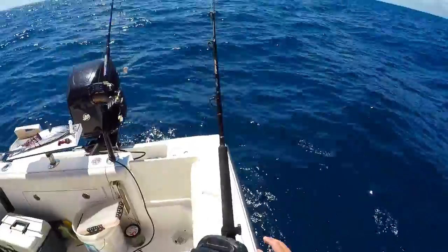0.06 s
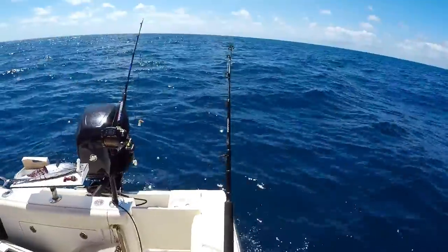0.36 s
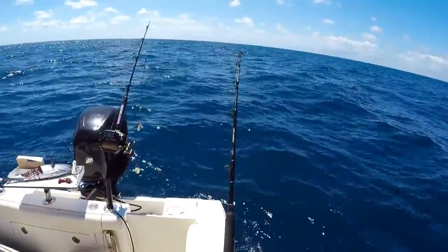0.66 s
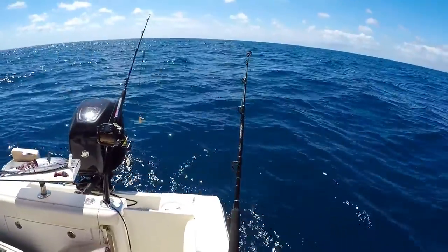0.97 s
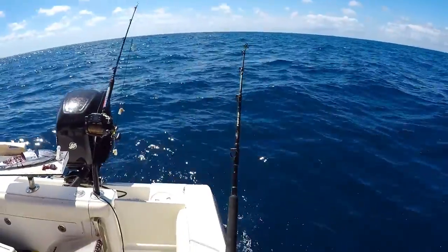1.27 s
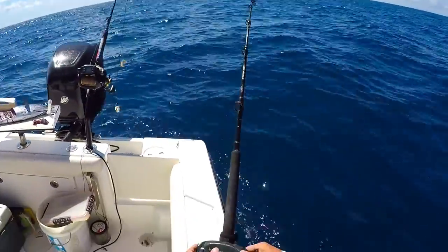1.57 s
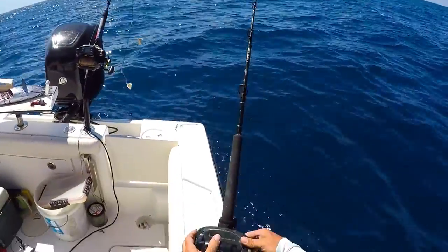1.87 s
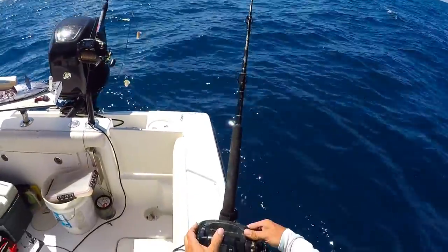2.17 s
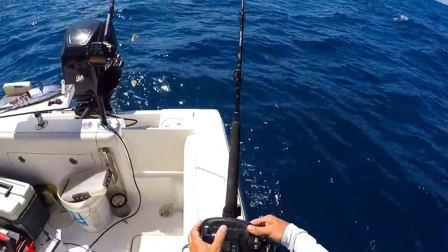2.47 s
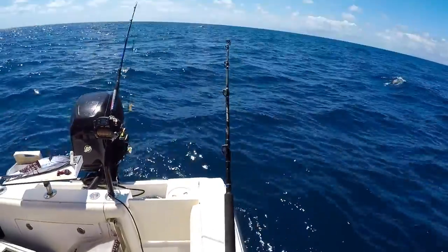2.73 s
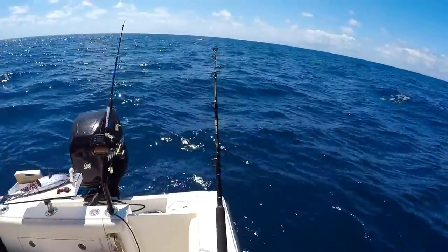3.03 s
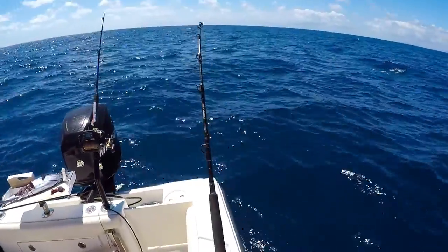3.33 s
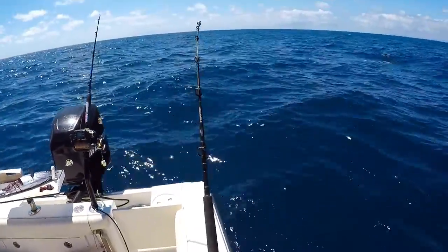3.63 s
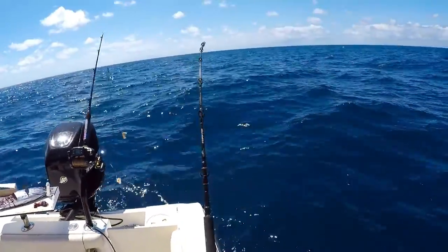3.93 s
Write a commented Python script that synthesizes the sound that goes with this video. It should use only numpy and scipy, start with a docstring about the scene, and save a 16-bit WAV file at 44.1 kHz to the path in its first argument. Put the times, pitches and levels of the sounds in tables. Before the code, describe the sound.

An electric fishing reel whirrs and rasps on a small boat at sea, slowing under load, then speeding up. Wind buffets the microphone, water slops along the hull and an outboard idles; a wave slaps near the end.

```python
"""An electric fishing reel winds in line on a small boat at sea. From the start its gear tones slide
through the housing's resonances over a rasp that turns with the shaft, while wind rumbles on the
microphone, water washes along the hull and the outboard idles. Hollow slops, light knocks and hard
buffets soon break in. As the swell loads the line the motor slows, and the reel hisses and squeaks
once; then it speeds up again, and near the end a wave slaps the hull on the right."""
import sys
import numpy as np
from scipy import signal
from scipy.fft import rfft, irfft
from scipy.io import wavfile
from scipy.ndimage import uniform_filter1d

SR = 44100
rng = np.random.default_rng(int(sys.argv[2]) if len(sys.argv) > 2 else 0)


def bounce(signal):
    """Save signal as a 16-bit WAV file at the path given by the first command-line argument."""
    frames = np.transpose(np.atleast_2d(signal))
    limited = np.clip(frames, -1, 1)
    pcm = np.round(limited * 32767).astype(np.int16)
    wavfile.write(sys.argv[1], SR, pcm)


N = 176400
T = np.arange(N) / SR
HZ = np.fft.rfftfreq(N, 1 / SR)


def amp(db):
    """Amplitude ratio for a level in decibels."""
    return 10 ** (np.asarray(db) / 20)


def unit(x):
    """Normalisation to an rms of 1."""
    return x / np.sqrt(np.mean(x ** 2) + 1e-20)


def curve(rows):
    """Linear interpolation of a time table's columns at every sample."""
    times, *columns = np.transpose(rows)
    return np.array([np.interp(T, times, column) for column in columns])


def spectrum(rows):
    """Interpolation of a frequency table's columns on a logarithmic axis."""
    hz, *columns = np.transpose(rows)
    return np.array([np.interp(np.log(HZ + 1), np.log(hz), column) for column in columns])


def wander(rate_hz):
    """Random fluctuation: low-pass noise of rms 1."""
    return unit(irfft(rfft(rng.standard_normal(N)) / (1 + (HZ / rate_hz) ** 4), N))


def pair(a, b, coherence):
    """Partial coherence: two channels mixed from two independent signals."""
    return np.array([a, coherence * a + np.sqrt(1 - coherence ** 2) * b])


def panned(side_db):
    """Constant-power gains for a level difference, left minus right."""
    gains = amp(np.array([[side_db], [-side_db]]) / 2)
    return gains / np.sqrt(np.mean(gains ** 2))


def add(mix, start, sound):
    """Superposition of a sound on the mix, from a start in seconds."""
    part = mix[:, max(round(start * SR), 0):][:, :sound.shape[-1]]
    part += sound[..., :part.shape[1]]


def gear_tones(turns, waver_db=1.1, throb_depth=0.6, throb_above_order=80):
    """Forced vibration: tooth meshes and their sidebands, locked to the shaft, drive the housing."""
    # Each row: order in cycles per shaft turn, level in dB before the housing colours it.
    partials = [(18.8, -34), (22, -41), (31, -34.5), (33, -50), (55, -53), (57, -33), (60, -48), (62, -41),
                (64, -49), (66, -50), (72, -50), (77, -49), (88, -49), (93, -39.5), (110, -52), (117, -46),
                (124, -52), (174, -47.5), (186, -45), (217, -48), (231, -45), (234, -46), (262, -48),
                (288, -47), (291, -44)]
    # The housing's resonances. Each row: frequency in Hz, left gain in dB, right gain in dB.
    housing = [(420, -9, -10), (490, -7, -4), (535, -2, -1), (575, -13, -13), (680, -16, -6), (800, -8, -2),
               (848, 0, 5), (885, 1, 3), (910, -10, -5), (1000, -9, -3), (1235, -2, -5), (1290, 3, 1),
               (1380, 4, 2), (1480, -4, -7), (1535, 1, -3), (1600, -11, -11), (1780, -13, -11),
               (2000, -7, -3), (2400, -4, -6), (2600, -7, -6), (2790, 1, 5), (2930, 2, 5), (3100, -3, -2),
               (3700, -9, -12), (3960, 0, 5), (4200, -6, -2), (7000, -5, -3), (9500, -16, -16)]
    throb = 1 + throb_depth * np.cos(2 * np.pi * 2 * turns)
    tones = np.zeros(N)
    for order, db in partials:
        tone = amp(db + waver_db * wander(16.5)) * np.sin(2 * np.pi * (order * turns + rng.random()))
        tones += tone * throb if order > throb_above_order else tone
    return np.sqrt(2) * irfft(rfft(tones) * amp(spectrum(housing) - 0.17), N)


def rasp_spectrum(speed, turns, repeat_share=0.3, flicker_db=1.75):
    """Friction noise of rough teeth: it partly repeats each turn, throbs twice a turn and flickers."""
    # Bands that move with speed. Each row: centre and width in cycles per turn, lift in dB.
    bands = [(63.9, 5.4, 2), (120.3, 5.8, 4), (194, 4.3, 2.5), (277, 15, 3)]
    pattern = unit(irfft(np.exp(2j * np.pi * rng.random(512)), 16384))
    repeating = np.interp(turns % 1, np.linspace(0, 1, len(pattern)), pattern)
    friction = np.sqrt(repeat_share / 2) * repeating + np.sqrt(1 - repeat_share) * rng.standard_normal(N)
    hz, t, frames = signal.stft(friction, SR, nperseg=256)
    order = hz[:, None] / np.interp(t, T, speed)
    lift_db = sum(db * np.exp(-((order - centre) / width) ** 2) for centre, width, db in bands)
    patches = uniform_filter1d(rng.standard_normal(frames.shape), size=5, axis=0)
    patches = unit(uniform_filter1d(patches, size=10, axis=1))
    throb_depth = 0.19 * np.exp(-hz[:, None] / 5060)  # shallower in the treble
    throb = 1 + throb_depth * np.cos(2 * np.pi * 2 * np.interp(t, T, turns))
    _, rasp = signal.istft(frames * throb * amp(lift_db + flicker_db * patches), SR, nperseg=256)
    return rfft(rasp[:N])


def reel(jitter=0.0008, load_db_per_slowing=0.25, tone_follows_rasp=0.25):
    """Rotating machinery: one shaft paces tones and rasp; the teeth sing louder as load slows it."""
    # Each row: time in seconds, shaft speed in turns per second.
    shaft_speed = [(0.0, 21.81), (0.25, 24.78), (0.5, 27.57), (0.75, 28.67), (1.0, 28.44), (1.25, 27.42),
                   (1.5, 25.95), (1.75, 24.75), (2.0, 23.7), (2.25, 22.8), (2.5, 22.55), (2.75, 23.66),
                   (3.0, 25.4), (3.25, 27.67), (3.5, 29.98), (3.75, 31.37), (4.0, 31.76)]
    # Each row: time in seconds, relative level of the rasp in dB.
    rasp_levels = [(0, -42.5), (0.19, -39.5), (0.58, -31.5), (0.73, -33.5), (1.43, -30), (2.47, -30.5),
                   (2.64, -32.5), (3.26, -29.5), (4.0, -31.5)]
    # Rasp of gears and line. Each row: frequency in Hz, left and right relative density in dB.
    rasp_colour = [(304, 4.5, -31), (556, -2, 2), (670, -26, 2.5), (856, -7, 0), (1000, -7, -9),
                   (1248, -16, -4.5), (1503, 6, 1.5), (1806, -15.5, -7.5), (1990, -4.5, 1.5),
                   (2400, -5, -6), (3010, -1, 1.5), (3670, -13, -6), (3830, -1.5, -5), (4620, -11, -6),
                   (5290, -0.5, -6.5), (5950, -5.5, -3.5), (5940, -12, 3), (6850, -2.5, -5.5),
                   (7580, -11, -1), (8120, -11.5, -15), (9380, -3.5, -7.5), (11220, -20.5, -20.5),
                   (14100, -25, -26)]
    # Each row: frequency in Hz, coherence of the channels, phase lead of the left in radians.
    stereo_field = [(500, .85, -.3), (900, .85, .4), (1350, .85, -.4), (1600, .65, -1.4), (2000, .6, -.8),
                    (2800, .75, -1.1), (3800, .5, -.1), (5170, .5, -1.8), (6120, .75, -5.2),
                    (6900, .75, -7.6), (8200, .6, -12.5), (9300, .78, -14.6), (10200, .6, -15.9)]
    speed = uniform_filter1d(curve(shaft_speed)[0], size=SR // 5, mode="nearest")
    turns = np.cumsum(speed * (1 + jitter * wander(25.8))) / SR
    slowing = -np.gradient(speed, T)  # turns per second lost each second
    rasp_db = curve(rasp_levels)[0] + 2
    tone_db = tone_follows_rasp * (rasp_db - rasp_db.mean()) + load_db_per_slowing * slowing
    coherence, lead = spectrum(stereo_field)
    friction = pair(rasp_spectrum(speed, turns), rasp_spectrum(speed, turns), coherence)
    rasp = unit(irfft(friction * amp(spectrum(rasp_colour)), N))
    left, right = rfft(amp(rasp_db) * rasp + amp(tone_db) * gear_tones(turns))
    return irfft(np.array([left, right * np.exp(-1j * lead)]), N)


def reel_hiss(coherence=0.46):
    """Broadband treble noise from the reel, strongest while the motor labours."""
    # Each row: frequency in Hz, relative spectral density in dB.
    colour = [(3000, -25), (5500, -5), (6700, 1), (8200, -9), (10000, -8), (12200, -7), (14000, -11)]
    # Each row: time in seconds, rms level in dB.
    levels = [(0, -56), (1.2, -54), (1.7, -45), (2.35, -44), (2.65, -54), (4, -56)]
    noise = pair(*rng.standard_normal((2, N)), coherence)
    hiss = irfft(rfft(noise) * amp(spectrum(colour)), N)
    return amp(curve(levels)) * unit(hiss)


def wind(crossover_hz=125, flutter_db=2.5, coherence=0.073):
    """Turbulent pressure at the microphone: a fluttering rumble, nearly unrelated left and right."""
    # Each row: time in seconds, left and right relative level in dB, tilt of body over depth in dB.
    gusts = [(0, -34, -38, -6), (.1, -25, -24.5, -0.5), (.42, -21.5, -30, 5), (.8, -18, -23.5, 6.5),
             (1.1, -17.5, -20.5, -4.5), (1.42, -16.5, -25.5, 5.5), (1.6, -22.5, -21.5, 1.5),
             (2.25, -30, -22.5, 5), (2.5, -21, -21, 8.5), (2.63, -27, -25, 6.5), (2.78, -15, -18.5, 4),
             (2.96, -16, -31, 3), (3.08, -18.5, -25.5, 7), (3.3, -19.5, -31.5, 4.5), (3.6, -22, -19, 1),
             (3.85, -23.5, -35, 3), (4, -18, -28, 6)]
    # Each row: frequency in Hz, relative spectral density in dB.
    colour = [(10, 1), (30, -3), (65, 2.5), (110, 1.5), (160, -2), (230, -7), (320, -14.5), (450, -24),
              (800, -33.5), (2000, -36), (8000, -94)]
    left_db, right_db, tilt_db = curve(gusts)
    eddies = [rng.standard_normal(N) * amp(flutter_db * wander(22)) for _ in range(2)]
    pressure = rfft(pair(*eddies, coherence)) * amp(spectrum(colour))
    lowpass = 1 / (1 + (HZ / crossover_hz) ** 4)
    deep = irfft(pressure * lowpass, N) * amp(-tilt_db / 2)
    body = irfft(pressure * (1 - lowpass), N) * amp(tilt_db / 2)
    return unit(deep + body) * amp(0.5 + np.array([left_db, right_db]))


def hull_wash(churn_db=3, coherence=0.5):
    """Flow noise of water along the hull, randomly modulated in amplitude."""
    # Each row: frequency in Hz, relative spectral density in dB.
    colour = [(150, -13), (330, 3.5), (600, -0.5), (1000, -10), (2100, -9), (5000, -14.5), (12000, -32.5)]
    # Each row: time in seconds, rms level in dB.
    levels = [(0, -32.5), (.35, -31.5), (.55, -43), (4, -44)]
    noise = pair(*rng.standard_normal((2, N)), coherence)
    wash = irfft(rfft(noise) * amp(spectrum(colour)), N)
    return amp(curve(levels)) * unit(wash * amp(churn_db * wander(19)))


def outboard(waver_db=3, drift=0.01113):
    """Nearly periodic vibration: the idling engine hums in two harmonics that drift together."""
    # Each row: frequency in Hz, median amplitude in dB.
    harmonics = [(104, -31.5), (312, -51)]
    clock = np.cumsum(1 + drift * wander(4.53)) / SR
    return sum(amp(db + waver_db * wander(35)) * np.sin(2 * np.pi * (hz * clock + rng.random()))
               for hz, db in harmonics)


def slops(pitch_waver=0.074):
    """Cavity resonance: air pockets between water and hull give short, hollow, unsteady notes."""
    # Each row: start in seconds, length in seconds, pitch in Hz, peak level in dB.
    pockets = [(0.129, 0.034, 425, -26.5), (0.577, 0.25, 229, -22.5), (1.643, 0.069, 234, -21.5),
               (1.833, 0.059, 239, -21), (2.502, 0.049, 374, -27.5), (2.708, 0.049, 228.7, -24.5)]
    out = np.zeros((2, N))
    for start, length, hz, db in pockets:
        t = np.arange(0, length, 1 / SR)
        cycles = np.cumsum(hz * (1 + pitch_waver * wander(36)[:len(t)])) / SR
        add(out, start, amp(db) * np.sin(np.pi * t / length) * np.sin(2 * np.pi * cycles))
    return out


def impacts(strikes, modes, pan=1):
    """Free vibration: each strike sets off the same exponentially decaying modes."""
    out, t = np.zeros((2, N)), np.arange(SR // 10) / SR
    ring = sum(amp(db - 60 * t / t60) * np.sin(2 * np.pi * hz * t) for hz, db, t60 in modes)
    for start, db in strikes:
        add(out, start, amp(db) * pan * ring)
    return out


def knocks():
    """Heavily damped modes make light knocks on the boat sound dull."""
    # Each row: start in seconds, gain in dB.
    strikes = [(0.257, -21), (2.874, -25.5), (3.299, -22)]
    # Each row: frequency in Hz, relative level in dB, time to decay by 60 dB in seconds.
    boat_modes = [(302, 5.5, 0.031), (495, -23.5, 0.05), (690, -11, 0.059), (907, -5.5, .04),
                  (1235, -13, 0.03), (1450, -10, 0.06)]
    return impacts(strikes, boat_modes)


def buffets(decay_cycles=0.37):
    """Pressure pulses of hard eddies at the microphone: a pointed push with a swing on either side."""
    # Each row: time of the peak in seconds, level in dB, left minus right in dB, pitch in Hz.
    eddies = [(0.367, -10.5, 6, 81), (2.453, -14, -2, 150), (2.756, -7, 6, 159), (3.07, -9, 5, 140),
              (3.42, -11.5, 10, 114), (3.666, -12, 16, 170)]
    out, t = np.zeros((2, N)), np.arange(-SR // 20, SR // 20) / SR
    for peak_time, db, side_db, hz in eddies:
        pulse = np.exp(-abs(t) * hz / decay_cycles) * np.cos(2 * np.pi * hz * t)
        add(out, peak_time + t[0], amp(db) * panned(side_db) * pulse)
    return out


def squeak(start_s=2.335, length_s=0.022, hz=3380, fall_hz_per_s=15000, db=-29):
    """A linear downward chirp: one tiny squeak of the reel."""
    out, t = np.zeros((2, N)), np.arange(0, length_s, 1 / SR)
    cycles = np.cumsum(hz - fall_hz_per_s * t) / SR
    chirp = np.sin(np.pi * t / length_s) * np.sin(2 * np.pi * cycles)
    add(out, start_s, amp(db) * panned(side_db=4) * chirp)
    return out


def wave_slap():
    """Impact excitation: a wave touches the hull, then hits it, and its low modes thud."""
    # Each row: start in seconds, gain in dB.
    strikes = [(3.554, -14), (3.568, -8.5)]
    # Each row: frequency in Hz, relative level in dB, time to decay by 60 dB in seconds.
    hull_modes = [(129, -1, 0.083), (225, -10, 0.028), (352, -8, 0.028)]
    return impacts(strikes, hull_modes, panned(side_db=-7))


def scene():
    """Superposition of the reel, wind, water, engine and boat."""
    continuous = reel() + reel_hiss() + wind() + hull_wash() + outboard()
    return continuous + slops() + knocks() + buffets() + squeak() + wave_slap()


def record(dry):
    """Band limiting: a linear-phase low-pass filter removes the treble above 14.1 kHz."""
    lowpass = signal.firwin(511, 14100, window=("kaiser", 9), fs=SR)
    return signal.oaconvolve(dry, lowpass[None], "same")


dry = scene()
out = record(dry)
bounce(out)
```